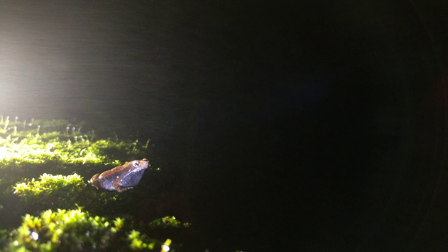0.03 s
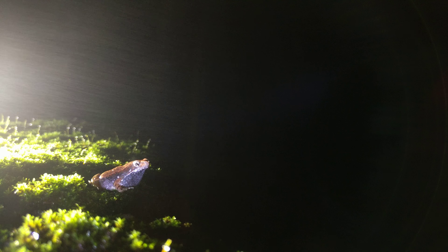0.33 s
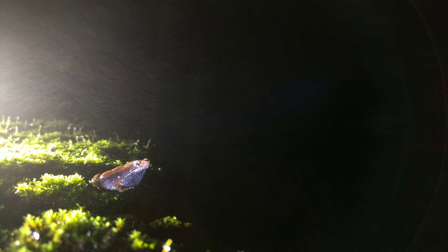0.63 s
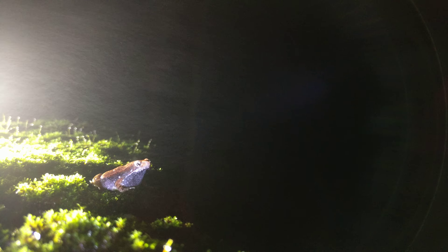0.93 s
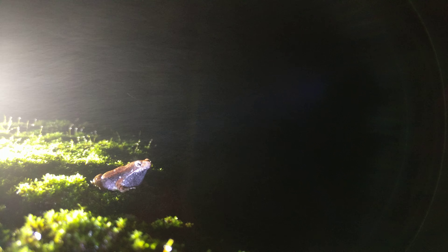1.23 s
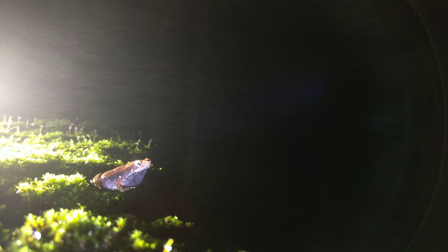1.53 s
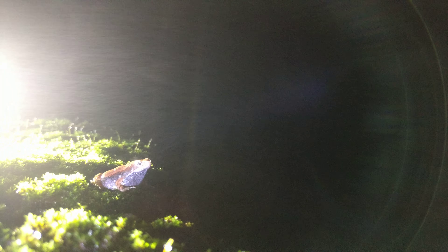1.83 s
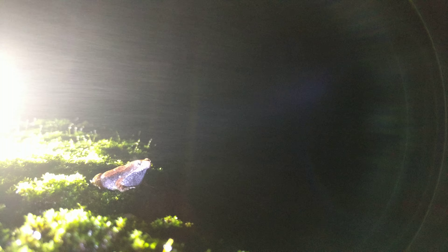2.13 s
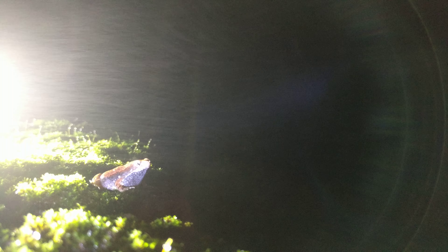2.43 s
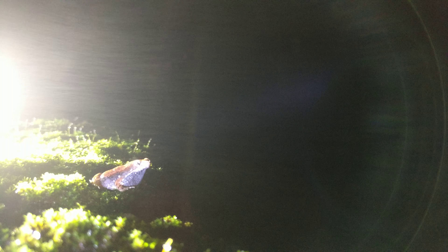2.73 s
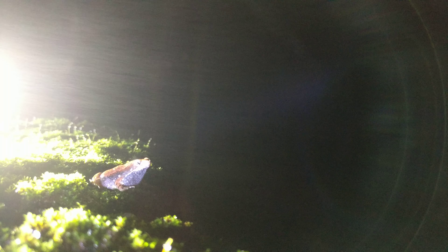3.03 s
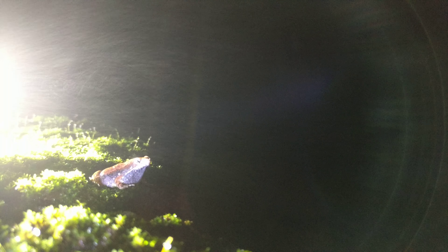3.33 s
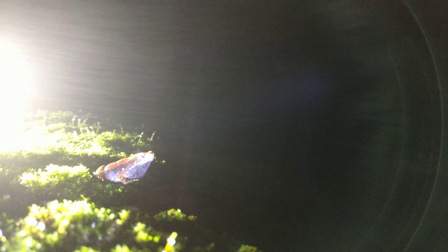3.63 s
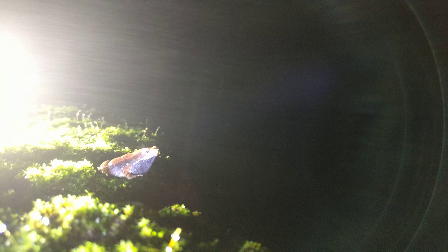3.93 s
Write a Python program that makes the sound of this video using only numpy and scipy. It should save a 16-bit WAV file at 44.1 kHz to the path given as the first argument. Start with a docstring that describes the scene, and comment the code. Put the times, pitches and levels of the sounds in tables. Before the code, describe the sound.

Small frogs croak by turns outdoors at night, each high, rasping call a quick train of pulses that swells and mostly rises slightly. A steady hiss and low rumble lie beneath, with faint ticks and dull microphone bumps late on.

```python
"""Small frogs croak by turns at night. Each croak is a train of pulses, about 27 a second, that mostly
swells and climbs in pitch. A pulse joins the tone of the vocal sac to a low knock and a rasp from the
throat, and nearby ground and plants scatter it. Faint ticks, a rustle and dull bumps on the microphone
sound over a steady hiss and a low rumble. The left microphone is the duller one."""
import sys
import numpy as np
from scipy import signal
from scipy.fft import rfft, irfft
from scipy.io import wavfile
from scipy.ndimage import uniform_filter1d

SR = 44100
rng = np.random.default_rng(int(sys.argv[2]) if len(sys.argv) > 2 else 0)


def waveform_to_disk(signal):
    """Save audio, clipped to [-1, 1], as 16-bit WAV at the path in sys.argv[1]."""
    frames = np.transpose(np.atleast_2d(signal))
    scaled = np.clip(frames, -1, 1) * 32767
    samples = np.round(scaled).astype(np.int16)
    wavfile.write(sys.argv[1], SR, samples)


N = 176400
T = np.arange(N) / SR

# The croaks. Each row: first and last pulse in seconds, extra wait after the first pulse in seconds,
# level in dB, swell in dB, crest as a share of the length, first and last pitch in Hz, relative gains
# of knock, rasp, scatter and left side in dB, roughness from 0 to 1, left phase lead in seconds,
# echo delay in seconds, echo gain in dB.
CALLS = [ (0.16, 0.471, 0.0047, -37, 10.5, 0.55, 2517, 2623, -12, -6, 7, 3, .4, -0.0036, 0.0098, -9),
         (0.67, 1.061, 0.01, -25.5, 18.5, 0.82, 2317, 2510, -5.5, -4, -1, 2.5, 0.07, -.00002, 0.022, -10.5),
         (1.266, 1.553, -0.003, -28, 12, 0.74, 2290, 2340, -11, -8.5, -4, 3, .08, .0001, .018, -8),
         (1.75, 2.021, 0.002, -27.5, 6, 0.7, 2350, 2340, -16, -5.5, -4, 0.5, .2, .00022, .014, -15),
         (2.18, 2.565, 0.011, -26.5, 14, 0.61, 2328, 2495, -3, -1.5, 2, 0.5, 0.15, -.00002, 0.023, -14.5),
         (2.36, 2.62, 0.002, -27, 5.5, 0.49, 2513, 2602, -40, -11.5, 2, 1.5, 0.4, -.00005, .012, -5),
         (2.856, 3.127, 0, -44.5, 0, 0.97, 2360, 2370, -15, -4, 9, 1, .9, -.00005, .012, -7),
         (3.125, 3.488, 0, -25.5, 12, 0.72, 2290, 2370, -12, -9, -0.5, 1.5, .12, .0001, .018, -9),
         (3.692, 3.997, 0.00074, -41.5, 7, 0.68, 2626, 2584, -14, -4.5, 7.5, 2, 0.85, -.00005, .012, -5), ]
# Throat resonances. Each row: frequency ratio to the low partial, gain in dB, decay in seconds.
THROAT_MODES = [(1.026, -3.5, 0.005), (0.985, -20.5, 0.018), (1.624, -7, .0016), (3.188, -3.5, 0.00095)]
# Spectra of the rasp, scattered sound, hiss and rumble. Each row: frequency in Hz, relative level in dB.
RASP_SPECTRUM = [(780, -44), (1020, -2), (1400, 3), (1750, 8.5), (2100, 9), (2650, 13.5), (3100, 4),
                 (3650, 4), (4300, -2.5), (6200, -12), (7500, -31)]
SCATTER_SPECTRUM = [(1100, -3), (1700, -.5), (2400, -1), (3800, 1.5)]
HISS_SPECTRUM = [(200, -3), (400, -10), (700, -6), (1400, -5), (2000, -1), (2500, 3.5), (3100, 1),
                 (4200, 0), (6200, -1), (6800, -13), (8200, -18.5), (11000, -14.5), (13000, -16),
                 (14300, -8), (15700, -4)]
RUMBLE_SPECTRUM = [(29, -53), (42, -5.5), (68, -2.5), (110, -3.5), (160, -8), (230, -11), (330, -20),
                   (600, -28.5), (1500, -57)]
# Faint ticks. Each row: start in seconds, level in dB, centre in Hz, width in octaves, decay in seconds.
TICK_BURSTS = [(0.353, -52, 12500, 0.19, 0.0099), (0.865, -43.5, 7000, 0.48, 0.0027),
               (1.776, -48.5, 9400, 0.13, 0.0066), (2.36, -50, 11200, 0.19, 0.0059),
               (2.764, -47, 1120, 1, 0.0021), (3.036, -47.5, 880, 0.44, 0.0025),
               (3.302, -56, 890, 1, 0.0059), (3.396, -39.5, 2490, 1.7, 0.0068),
               (3.456, -39, 2200, 1.3, 0.0081), (3.468, -35.5, 4780, 0.38, 0.0044)]
# Bumps on the microphone. Each row: start in seconds, level in dB.
MIC_BUMPS = [(3.340, -43), (3.650, -42), (3.742, -43), (3.797, -40), (3.881, -32)]
# Envelopes of the hiss, its sizzling top and the rumble. Each row: time in seconds, level in dB.
HISS_ENVELOPE = [(0.095, -120), (0.118, -55.5), (0.2, -51.5), (0.4, -47.5), (1.0, -44.5), (2.0, -43),
                 (2.3, -43), (2.6, -39.5), (2.9, -42.5), (3.4, -41.5), (4.0, -42.5)]
SIZZLE_ENVELOPE = [(0.11, -81), (0.4, -59), (2.0, -83), (2.9, -56), (3.4, -49.5), (4.0, -50.5)]
RUMBLE_ENVELOPE = [(0.11, -81), (0.25, -63.5), (0.37, -55), (1.7, -53.5), (2.3, -55.5), (2.98, -56),
                   (3.2, -48.5), (3.55, -51.5), (3.8, -52), (4.0, -52)]
# Response of the left microphone against the right. Each row: frequency in Hz, gain in dB.
LEFT_RESPONSE = [(60, 4.5), (130, 3.5), (300, -4), (700, -3), (1200, -6.5), (2400, -10), (3200, -11),
                 (4400, -18), (8000, -13.5), (15000, -15.5)]

PULSE_SPACING_S, PULSE_LEAD_S, PULSE_ATTACK_S = .0375, .0028, .0014
PITCH_JITTER, SHIMMER_DB, FIRST_PULSE_DB = .012, .6, -1.5
SAC_HOLD_S, FIRST_HOLD_SHARE, SAC_ROUGH_HZ = .0042, .73, 195   # early pulses are shorter
LOW_PARTIAL_RATIO, KNOCK_CREST, KNOCK_FADE_DB, RASP_FADE_DB = .47, .22, 23.5, 6
PATH_SPREAD_CYCLES = .1   # the paths to the two microphones differ from pulse to pulse
SCATTER_T60_S, SCATTER_ONSET_S, SCATTER_GAP_SHARE = .33, .0051, .87


def frogs():
    """Direct and reflected sound add at the microphones; far frogs are heard mostly by reflection."""
    direct, reflected = np.zeros((2, N)), np.zeros((2, N))
    for *call, scatter_db, left_db, roughness, lead_s, echo_s, echo_db in CALLS:
        voice = croak(*call, roughness, lead_s) * from_db([[left_db], [0]])
        direct += voice
        reflected += scatter(voice, scatter_db, echo_s, echo_db)
    return direct + colour(reflected, SCATTER_SPECTRUM)


def croak(start, end, wait, db, swell_db, crest, first_hz, last_hz, knock_db, rasp_db, roughness, lead_s):
    """Pulsed excitation: each pulse drives a tone in the vocal sac and a knock and rasp in the throat."""
    out = np.zeros((2, N + SR))
    span = end - start - wait
    count = int(round(span / PULSE_SPACING_S)) + 1
    t = np.arange(SR // 32) / SR
    throat_noise = unit_power(colour(rng.standard_normal((2, N)), RASP_SPECTRUM))
    waver = sac_waver(roughness)
    for k, (detune, force, phase, path) in enumerate(rng.standard_normal((count, 4))):
        along = k / (count - 1)
        piece = slice(k * len(t), (k + 1) * len(t))
        hz = (first_hz + (last_hz - first_hz) * along) * (1 + PITCH_JITTER * detune)
        cycles = hz * t + np.array([[hz * lead_s + PATH_SPREAD_CYCLES * path], [0]])
        effort = from_db(-swell_db * ((along - crest) / crest) ** 2)
        hold = SAC_HOLD_S * (FIRST_HOLD_SHARE + (1 - FIRST_HOLD_SHARE) * min(2 * along, 1))
        tone = np.real(waver[piece] * np.exp(2j * np.pi * (cycles + phase)))
        sac = effort * tone * burst(t, PULSE_ATTACK_S, hold, decay_s=.0014)
        knock = throat_knock(t, LOW_PARTIAL_RATIO * cycles)
        knock *= from_db(knock_db - KNOCK_FADE_DB * (along - KNOCK_CREST) ** 2)
        rasp = throat_noise[:, piece] * burst(t, PULSE_ATTACK_S, hold_s=.0014, decay_s=.004)
        rasp *= np.sqrt(effort) * from_db(rasp_db - RASP_FADE_DB * along)
        gain = from_db(db + SHIMMER_DB * force + FIRST_PULSE_DB * (k == 0))
        onset = int((start + along * span + wait * (1 - .25 ** k) - PULSE_LEAD_S) * SR)
        out[:, onset:onset + len(t)] += gain * (sac + knock + rasp)
    return out[:, :N]


def sac_waver(roughness):
    """Random modulation of amplitude and phase roughens the tone of the vocal sac."""
    lowpass = signal.butter(2, SAC_ROUGH_HZ, fs=SR, output="sos")
    noise = unit_power(signal.sosfilt(lowpass, rng.standard_normal((2, N))))
    return np.sqrt(1 - roughness) + np.sqrt(roughness / 2) * (noise[0] + 1j * noise[1])


def throat_knock(t, cycles):
    """Modal ringing: each resonance of the throat dies away as a damped sinusoid."""
    return sum(from_db(db) * np.sin(2 * np.pi * ratio * cycles) * burst(t, .001, .001, decay_s)
               for ratio, db, decay_s in THROAT_MODES)


def scatter(x, scatter_db, echo_s, echo_db):
    """Scattering by ground and plants: convolution with many weak reflections and one distinct echo."""
    t = np.arange(SR // 2) / SR
    tail = rng.standard_normal((2, len(t))) * (rng.random((2, len(t))) < .05)
    tail *= from_db(-60 * t / SCATTER_T60_S) * np.clip(t / SCATTER_ONSET_S - SCATTER_GAP_SHARE, 0, 1)
    tail *= from_db(scatter_db) / np.sqrt(np.sum(tail ** 2, axis=1, keepdims=True))
    tail[:, int(echo_s * SR)] += from_db(echo_db)
    return signal.fftconvolve(x, tail, axes=1)[:, :N]


def ticks():
    """Transients: bands of noise that decay within milliseconds are heard as ticks."""
    return sum(from_db(db) * band_noise(hz, octaves) * burst(T - start, .002, 0, decay_s)
               for start, db, hz, octaves, decay_s in TICK_BURSTS)


def rustle(peak_s=2.645, width_s=.06, db=-52):
    """A Gaussian envelope on a high band of noise gives a soft rustle with no sharp onset."""
    return from_db(db) * band_noise(hz=11800, octaves=.3) * np.exp(-.5 * ((T - peak_s) / width_s) ** 2)


def bumps(hz=85, decay_s=.011):
    """Heavy damping: a bump on the microphone dies within a few low cycles."""
    return sum(-from_db(db) * np.sin(2 * np.pi * hz * (T - s)) * burst(T - s, decay_s / 2, 0, decay_s)
               for s, db in MIC_BUMPS)


def background(flicker_db=1):
    """Filtered random noise: a slightly flickering hiss, a narrow sizzle above it and a rumble below."""
    flicker = unit_power(uniform_filter1d(rng.standard_normal(N), SR // 50))
    hiss = envelope(HISS_ENVELOPE) * from_db(flicker_db * flicker)
    hiss = hiss * stereo_noise(HISS_SPECTRUM, correlation=.13)
    sizzle = envelope(SIZZLE_ENVELOPE) * np.array([band_noise(hz=15200, octaves=.14) for _ in range(2)])
    rumble = envelope(RUMBLE_ENVELOPE) * stereo_noise(RUMBLE_SPECTRUM, correlation=.48)
    return hiss + sizzle + rumble


def stereo_noise(spectrum, correlation):
    """Partial coherence: each side mixes shared noise with noise of its own."""
    shared = np.sqrt(correlation) * rng.standard_normal(N)
    separate = np.sqrt(1 - correlation) * rng.standard_normal((2, N))
    return unit_power(colour(shared + separate, spectrum))


def band_noise(hz, octaves):
    """Band-pass filtering of pink noise by a bell curve in log frequency."""
    f = np.maximum(np.fft.rfftfreq(N, 1 / SR), 1)
    bell = np.exp(-.5 * (np.log2(f / hz) / octaves) ** 2)
    return unit_power(irfft(rfft(rng.standard_normal(N)) * bell / np.sqrt(f), N))


def colour(x, curve):
    """Linear filtering: the spectrum is multiplied by a gain curve."""
    hz, db = np.transpose(curve)
    f = np.maximum(np.fft.rfftfreq(2 * N, 1 / SR), 1)
    gain = from_db(np.interp(np.log(f), np.log(hz), db))
    return irfft(rfft(x, 2 * N) * gain)[..., :N]


def burst(t, attack_s, hold_s, decay_s):
    """Exponential decay after a linear rise and a hold."""
    return np.clip(t / attack_s, 0, 1) * np.exp(-np.maximum(t - attack_s - hold_s, 0) / decay_s)


def envelope(rows):
    """Gain over time, interpolated in decibels; silent before the first row."""
    return from_db(np.interp(T, *np.transpose(rows), left=-140))


def from_db(db):
    """Amplitude grows tenfold with every 20 dB."""
    return 10 ** (np.asarray(db) / 20)


def unit_power(x):
    """Normalisation by the root mean square."""
    return x / np.sqrt(np.mean(x ** 2) + 1e-20)


def scene():
    """Superposition: the pressures of all sources add."""
    return frogs() + background() + ticks() + rustle() + bumps()


def record(dry, low_cut_hz=33, high_cut_hz=15950):
    """Frequency response: the left microphone is duller, and both lose the deepest bass and the top."""
    heard = np.array([colour(dry[0], LEFT_RESPONSE), dry[1]])
    heard = signal.sosfilt(signal.butter(2, low_cut_hz, "high", fs=SR, output="sos"), heard)
    return signal.sosfilt(signal.ellip(12, .1, 80, high_cut_hz, fs=SR, output="sos"), heard)


dry = scene()
out = record(dry)
waveform_to_disk(out)
```